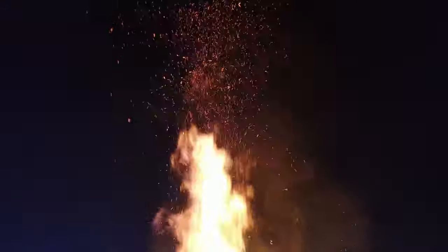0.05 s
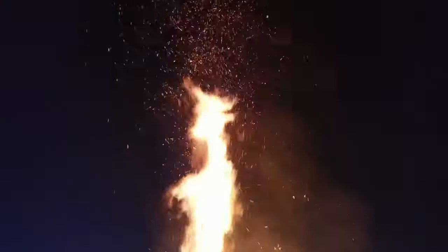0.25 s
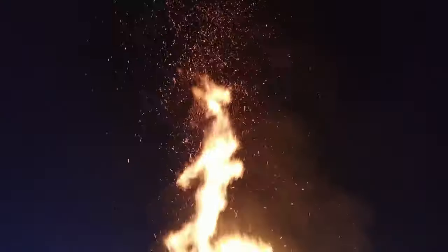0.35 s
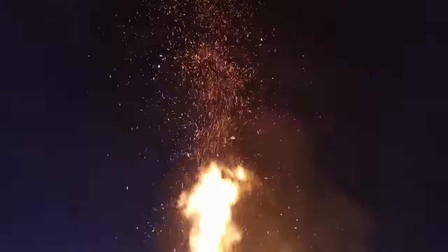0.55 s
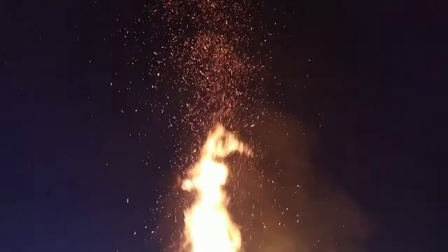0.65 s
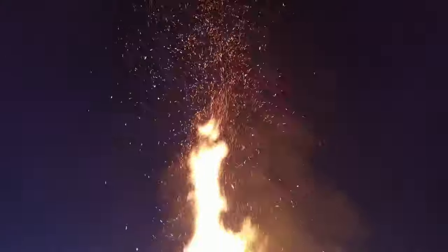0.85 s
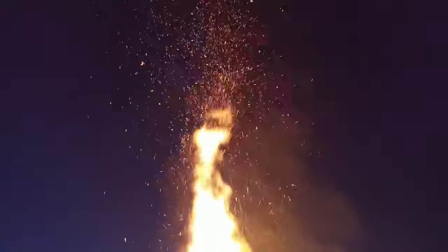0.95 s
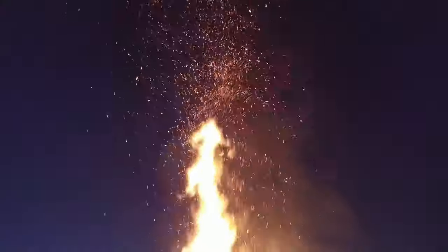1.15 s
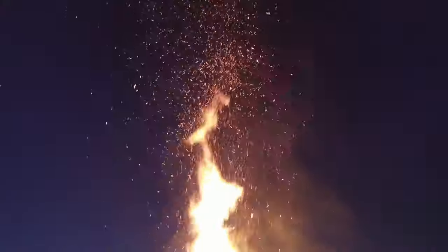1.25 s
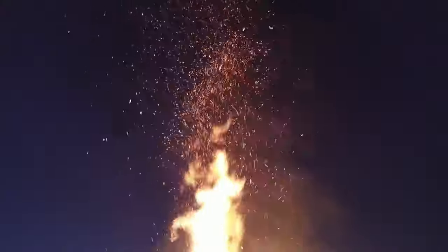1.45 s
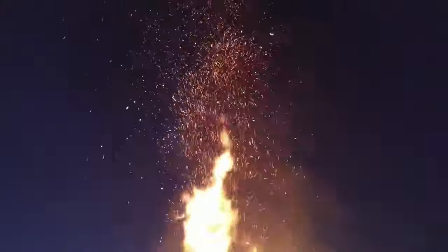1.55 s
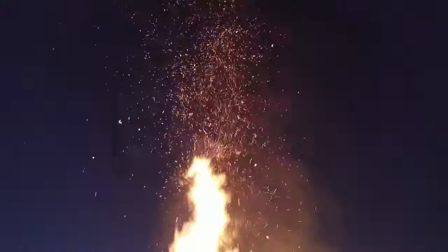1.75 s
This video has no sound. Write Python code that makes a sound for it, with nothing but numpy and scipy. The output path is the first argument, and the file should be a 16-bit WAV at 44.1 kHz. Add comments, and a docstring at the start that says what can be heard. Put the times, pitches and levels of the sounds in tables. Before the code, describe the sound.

Bonfire flames rush and crackle with sharp pops, the microphone briefly rubbed and bumped early on.

```python
"""A large bonfire burns in the open. From the start the flames rumble and rush, with a faint thin whistle,
a dense fine crackle and the ticks of sparks; pockets of steam burst in the wood as single sharp pops.
From about 0.23 s the microphone is jostled: a dull rub, two heavy bumps, then its holder shudders.
Boiling sap jets out twice during the rub and again at 1.2 s. Near the end one tongue of flame flaps."""
import sys
import numpy as np
from scipy.fft import rfft, irfft, next_fast_len
from scipy.io import wavfile
from scipy.ndimage import uniform_filter1d, map_coordinates

SR = 44100
rng = np.random.default_rng(int(sys.argv[2]) if len(sys.argv) > 2 else 0)


def generate_wav(sig):
    """Save sig (samples, or channels by samples) to the path in sys.argv[1] as 16-bit PCM at SR."""
    pcm = np.round(np.clip(np.atleast_2d(sig).T, -1, 1) * 32767).astype(np.int16)
    wavfile.write(sys.argv[1], SR, pcm)


N = 79380
T = np.arange(N) / SR

# strength of the blaze, followed by hiss and crackle: time_s, level_db
BLAZE_LEVEL = [(0.0, -45), (0.36, -45.5), (0.746, -49), (1.182, -48.5), (1.648, -49), (1.8, -47.5)]


def amp(db):
    """Decibels to amplitude ratio."""
    return 10 ** (np.asarray(db) / 20)


def unit_rms(x):
    """Normalisation to rms 1."""
    return x / np.sqrt(np.mean(x ** 2) + 1e-20)


def unit_energy(x):
    """Normalisation of each row to energy 1."""
    return x / np.linalg.norm(x, axis=-1, keepdims=True)


def spectrum_db(points, hz):
    """Interpolation of (frequency_hz, level_db) points on a logarithmic frequency axis."""
    knots_hz, db = np.transpose(points)
    return np.interp(np.log(hz + 1), np.log(knots_hz + 1), db)


def envelope_db(points):
    """Linear interpolation of (time_s, level_db) points at every sample."""
    return np.interp(T, *np.transpose(points))


def wobble(knots_per_s):
    """Random modulation: a spline through Gaussian values."""
    return map_coordinates(rng.standard_normal(N // 100), [T * knots_per_s], mode="wrap")


def filtered(x, response):
    """Linear filtering: the spectrum of x times a complex frequency response."""
    size = next_fast_len(N + SR // 2)
    return irfft(rfft(x, size) * response(np.fft.rfftfreq(size, 1 / SR)), size)[:N]


def noise(spectrum):
    """Spectral shaping of white noise, rms 1."""
    return unit_rms(filtered(rng.standard_normal(N), lambda hz: amp(spectrum_db(spectrum, hz))))


def narrow_noise(centre_hz, half_width_hz):
    """White noise through a Lorentzian band, rms 1."""
    band = lambda hz: 1 / (1 + ((hz - centre_hz) / half_width_hz) ** 2)
    return unit_rms(filtered(rng.standard_normal(N), band))


def minimum_phase(gain):
    """The causal response with the least delay for a given gain, by folding the cepstrum."""
    cepstrum = irfft(np.log(gain))
    half = cepstrum.shape[1] // 2
    cepstrum[:, 1:half] *= 2
    cepstrum[:, half + 1:] = 0
    return np.exp(rfft(cepstrum))


def bursts(rows, size=4096):
    """Source and filter: in each row a snap, a spray of splinters and its echo excite one broad band."""
    # colour common to all bursts: frequency_hz, gain_db
    colour = [(150, -21.5), (500, 16), (1000, 8), (3000, 3.5), (6000, 6.5), (8500, 5.5), (10500, -2),
              (13000, -12), (16000, -13)]
    snap_decay_s, skirt_db, ripple_db, ripple_hz = .00008, -13, 1.6, 1100
    grit = 1.1  # above 1, single chips stand out of the spray
    start_s, level_db, centre_hz, width_oct, splinter_db = np.transpose(rows)[:, :, None]
    t, hz = np.arange(size) / SR, np.fft.rfftfreq(size, 1 / SR)

    def spray(t60_s):
        """Gritty noise in exponential decay."""
        chips = rng.standard_normal((len(rows), size))
        return unit_energy(np.sign(chips) * np.abs(chips) ** grit * amp(-60 * t / t60_s))

    snap = unit_energy(np.exp(-t / snap_decay_s))
    splinters = spray(t60_s=.019)
    echo = amp(-5) * spray(t60_s=.037)  # scattered by the woodpile and the ground
    force = snap + amp(splinter_db) * (splinters + echo)
    band = np.exp(-(np.log2((hz + 1) / centre_hz) / width_oct) ** 2 / 2)
    # every piece of wood has its own uneven colour
    ripple = unit_rms(uniform_filter1d(rng.standard_normal(band.shape), int(ripple_hz * size / SR)))
    gain = (band + amp(skirt_db)) * amp(spectrum_db(colour, hz) + ripple_db * ripple)
    waves = unit_energy(irfft(rfft(force) * minimum_phase(gain)))
    waves = waves * amp(level_db) * np.sqrt(.008 * SR)  # the energy of 8 ms at level_db
    samples = np.round(start_s * SR).astype(int) + np.arange(size)
    return np.bincount(samples.ravel(), waves.ravel(), N)[:N]


def flame_roar():
    """Amplitude modulation of low noise: the flames rumble with a slight flutter."""
    # spectrum of the roar: frequency_hz, level_db
    roar_spectrum = [(20, -22), (35, -9.5), (55, 4), (85, 2), (130, 0), (200, -7), (400, -8), (700, -18.5),
                     (1100, -16), (1700, -45), (3000, -51)]
    # envelope of the roar: time_s, level_db
    roar_level = [(0, -40.5), (.2, -40), (.55, -43.5), (.72, -43), (.92, -43.5), (1.05, -44), (1.35, -42.5),
                  (1.55, -45), (1.8, -42.5)]
    flutter_db = .7
    return noise(roar_spectrum) * amp(envelope_db(roar_level) + flutter_db * wobble(knots_per_s=22))


def steam_hiss():
    """Broadband noise, amplitude-modulated by the blaze and by a fast random flicker."""
    # spectrum of the hiss: frequency_hz, level_db
    hiss_spectrum = [(410, -20), (700, 4), (1380, 6), (1730, 3), (2560, 3.5), (3240, 2.5), (4050, 0.5),
                     (5120, 0.5), (8420, -7), (15200, -27), (16000, -39)]
    offset_db, flicker_db = -3, 3.2
    hiss = noise(hiss_spectrum)
    return hiss * amp(envelope_db(BLAZE_LEVEL) + offset_db + flicker_db * wobble(knots_per_s=60))


def steam_whistle():
    """Narrow-band noise is heard as a pitch: a faint whistle that wavers in level."""
    level_db, waver_db = -60, 1
    gain = amp(level_db + waver_db * wobble(knots_per_s=13.9))
    return gain * narrow_noise(centre_hz=3190, half_width_hz=140)


def crackle():
    """Shot noise: small bursts at random times, most of them weak, swelling with the blaze."""
    bursts_per_s, floor_db, spread_db, range_db = 400, -65, 3.5, 12
    middle_hz, scatter_oct, width_oct, splinter_db = 3600, 1.2, .7, 2
    when, chance, up, down = rng.random((int(bursts_per_s * N / SR), 4)).T
    level_db = floor_db - spread_db * np.log(chance + np.exp(-range_db / spread_db))
    centre_hz = middle_hz * 2 ** (scatter_oct * (up - down))
    rows = [(s, db, hz, width_oct, splinter_db) for s, db, hz in zip(when * N / SR, level_db, centre_hz)]
    blaze_db = envelope_db(BLAZE_LEVEL)
    return bursts(rows) * amp(blaze_db - blaze_db.mean())


def sparks():
    """Impulses in a high band: bursting sparks give a few clear ticks among many fine ones."""
    # clear ticks: start_s, level_db
    clear_ticks = [(.019, -52), (.208, -54), (.2605, -41.5), (.3741, -41.5), (.405, -44), (.6709, -54),
                   (.9693, -46), (.9941, -49), (1.4413, -50), (1.6317, -46)]
    centre_hz, width_oct, splinter_db = 10760, .27, -13.5
    fine_per_s, floor_db, spread_db = 64, -62, 3
    when, chance = rng.random((int(fine_per_s * N / SR), 2)).T
    fine_ticks = zip(when * N / SR, floor_db - spread_db * np.log(chance + .022))
    return bursts([(s, db, centre_hz, width_oct, splinter_db) for s, db in [*clear_ticks, *fine_ticks]])


def damped_mode(start_s, level_db, pitch_hz, t60_s):
    """Free vibration of one mode: a sine in exponential decay."""
    age_s = np.maximum(T - start_s, 0)
    return amp(level_db - 60 * age_s / t60_s) * np.sin(2 * np.pi * pitch_hz * age_s)


def pops():
    """Impulsive excitation: pockets of steam burst in the wood, and a few sticks ring as they split."""
    # bursting pockets: start_s, level_db, centre_hz, width_oct, splinter_db (relative to the snap)
    steam_pockets = [(0.0678, -36, 2860, 0.7, -2), (0.0957, -32.5, 3740, 0.8, 4.5),
                     (0.0981, -39, 2000, 0.35, 11), (0.1054, -35.5, 5700, 0.88, -5),
                     (0.1229, -32.5, 3400, 1.23, -7), (0.1829, -35, 1790, 0.78, 1),
                     (0.1912, -38, 2540, 0.98, -4), (0.1991, -41.5, 2190, 0.9, 8),
                     (0.208, -40.5, 2220, 1.0, 8), (0.2274, -38.5, 1850, 1.1, 0),
                     (0.3013, -37, 2420, 1.0, 7), (0.3154, -41.5, 2420, 1.3, 3),
                     (0.3736, -35, 4140, 0.66, 1), (0.4071, -43, 2860, 0.73, -4),
                     (0.4118, -37.5, 3280, 1.1, -2), (0.4366, -43, 2400, 0.53, 19),
                     (0.4724, -42.5, 2350, 1, 4), (0.499, -41, 2620, 0.9, -5), (0.5263, -43, 3360, 0.56, 8),
                     (0.5368, -41, 1930, 0.7, -9), (0.5545, -51, 1410, 0.98, -6),
                     (0.5669, -43.5, 2190, 1, -8), (0.632, -33, 3180, 1.06, -1),
                     (0.6601, -46.5, 2410, 0.67, 12), (0.694, -40.5, 2900, 0.96, 3),
                     (0.7147, -47, 3660, 0.98, 1), (0.7905, -40, 2800, 0.4, 3), (0.8303, -41, 2170, 1, -1),
                     (0.86, -48.5, 3010, 0.73, -4), (0.883, -44, 2010, 1.2, -3),
                     (0.9351, -43, 1680, 1.1, -4), (0.9583, -41, 2140, 0.8, 3),
                     (0.9682, -43.5, 3620, 0.63, 4), (0.9814, -39, 3130, 0.6, -1),
                     (1.0308, -46, 2560, 0.98, -6), (1.0644, -36, 2760, 1.34, 7.5),
                     (1.1144, -39.5, 3200, 0.8, -4.5), (1.1321, -44, 3820, 0.47, 15),
                     (1.1736, -45.5, 2180, 1.2, 10), (1.1809, -41, 3540, 0.88, -6),
                     (1.2091, -40, 2520, 1.1, 7), (1.2646, -35, 2480, 0.86, 16),
                     (1.3134, -40, 3570, 0.76, -1), (1.3556, -44.5, 3190, 0.56, 8),
                     (1.3701, -45, 3180, 0.88, 3), (1.3865, -48.5, 2140, 0.87, 9),
                     (1.4217, -43, 3470, 0.8, -2), (1.4354, -40.5, 1880, 1, -3),
                     (1.4537, -42.5, 2560, 1, -3), (1.4679, -45.5, 1680, 1.1, -6),
                     (1.5784, -42.5, 1840, 0.93, 0.5), (1.6317, -42.5, 4600, 1.0, 16),
                     (1.6649, -45, 2080, 1.2, -37), (1.6904, -41.5, 2820, 0.37, 1),
                     (1.7539, -40.5, 3540, 0.46, 10), (1.7633, -34, 4300, 0.7, -4.5),
                     (1.7714, -42, 2950, 1, 4), (1.7897, -43.5, 3500, 0.37, -4),
                     (1.7955, -44.5, 2680, 0.9, 4)]
    # ringing sticks: start_s, level_db, pitch_hz, t60_s
    stick_modes = [(.1232, -23.5, 5570, 0.021), (.4372, -37, 2700, 0.035), (.4995, -31, 4700, 0.0091),
                   (1.2646, -31, 2150, 0.0055), (1.7895, -34, 3900, .012)]
    return bursts(steam_pockets) + sum(damped_mode(*mode) for mode in stick_modes)


def microphone_rub():
    """Friction noise: a dull, uneven rub on the jostled microphone."""
    # spectrum of the rub: frequency_hz, level_db
    rub_spectrum = [(25, -25), (60, 3.5), (110, 0.5), (170, 3), (250, 2), (380, -4), (520, -16.5),
                    (750, -24.5), (1100, -33), (2000, -75)]
    # envelope of the rub: time_s, level_db
    rub_level = [(.228, -42.5), (.241, -18), (.268, -17), (.285, -24), (.299, -19), (.313, -21.5),
                 (.328, -16), (.35, -22), (.38, -29), (.41, -56)]
    return noise(rub_spectrum) * amp(envelope_db(rub_level))


def microphone_bumps():
    """Transient response: two pushes ring the microphone's bass, and the last sets its holder shaking."""
    # pushes on the microphone: start_s, level_db, rise_s, release_s
    pushes = [(.2561, 2.7, .0008, .0021), (.3573, 3.4, .0003, .0033)]
    # resonant bass roll-offs: corner_hz, quality_factor
    bass_resonances = [(87.5, 1.73), (41, 1.7)]
    contact_hz = 1020  # a soft contact passes little above this
    force = np.zeros(N)
    for start_s, level_db, rise_s, release_s in pushes:
        rise = (1 + np.tanh((T - start_s) / rise_s)) / 2
        force += amp(level_db) * rise * np.exp(-np.maximum(T - start_s, 0) / release_s)

    def response(hz):
        """Second-order high-passes in cascade with the contact's low-pass."""
        stages = [-hz ** 2 / (f0 ** 2 - hz ** 2 + 1j * hz * f0 / q) for f0, q in bass_resonances]
        return np.prod(stages, axis=0) / (1 + (hz / contact_hz) ** 6)

    return filtered(force, response) + holder_shudder(start_s=pushes[-1][0])


def sap_jets():
    """Jet noise: boiling sap escapes in short narrow-band puffs with Gaussian envelopes."""
    # jets: peak_s, sigma_s, centre_hz, level_db
    jets = [(0.264, 0.012, 6800, -51), (0.333, 0.017, 6600, -54), (1.22, 0.0086, 7300, -53.5)]
    return sum(amp(db) * np.exp(-((T - peak_s) / sigma_s) ** 2 / 2) * narrow_noise(hz, half_width_hz=600)
               for peak_s, sigma_s, hz, db in jets)


def holder_shudder(start_s):
    """Damped vibration: the microphone's holder swings in one low mode under a dying rumble."""
    # spectrum of the rumble: frequency_hz, level_db
    shudder_spectrum = [(20, -26), (45, 9.5), (70, 6), (130, -2.5), (220, -23), (500, -46), (1500, -80)]
    level_db, rise_s, t60_s = -26, .0028, .49
    age_s = np.maximum(T - start_s, 0)
    envelope = amp(level_db - 60 * age_s / t60_s) * (1 - np.exp(-age_s / rise_s))
    swing = -damped_mode(start_s, level_db=-24, pitch_hz=59.4, t60_s=.15)
    return swing + noise(shudder_spectrum) * envelope


def flame_flap():
    """A Gaussian chirp: one tongue of flame flutters aloud, sagging in pitch."""
    peak_s, sigma_s, level_db = 1.713, .02, -36
    pitch_at_peak_hz, sag_per_s = 135.5, 7.8
    t = np.clip(T - peak_s, -.1, .1)
    phase = 2 * np.pi * np.cumsum(pitch_at_peak_hz * np.exp(-sag_per_s * t)) / SR
    return amp(level_db) * np.exp(-(t / sigma_s) ** 2 / 2) * np.sin(phase)


def scene():
    """Superposition of the fire and the handling noise in one channel."""
    fire = flame_roar() + steam_hiss() + steam_whistle() + crackle() + sparks() + pops()
    return (fire + microphone_rub() + microphone_bumps() + sap_jets() + flame_flap())[None]


def record(dry):
    """Clipping at full scale, then an ideal low-pass at the band limit."""
    band_limit_hz = 16200
    return filtered(np.clip(dry[0], -1, 1), lambda hz: hz < band_limit_hz)[None]


dry = scene()
out = record(dry)
generate_wav(out)
```